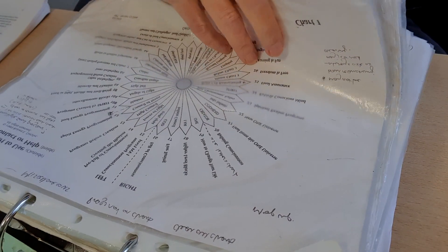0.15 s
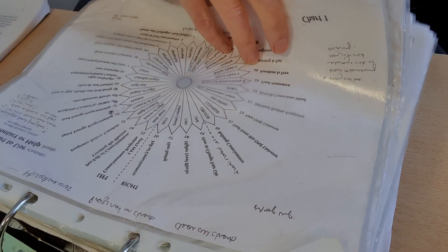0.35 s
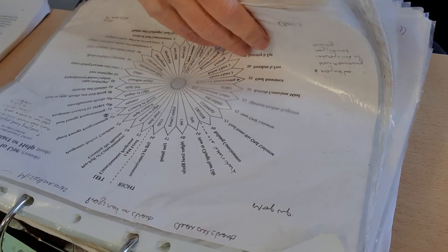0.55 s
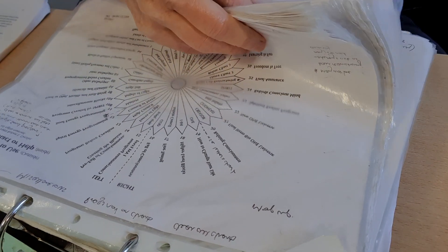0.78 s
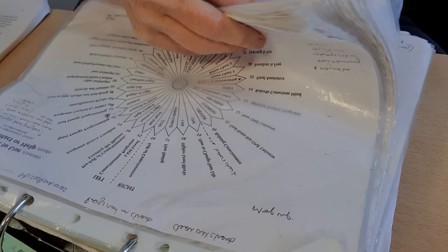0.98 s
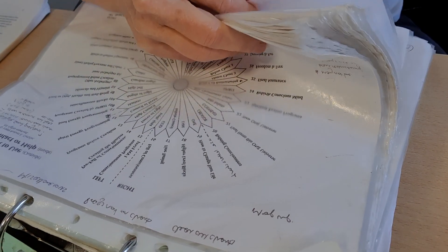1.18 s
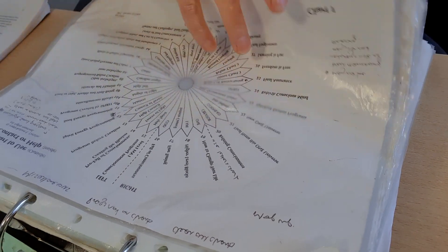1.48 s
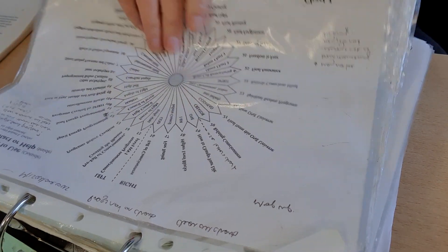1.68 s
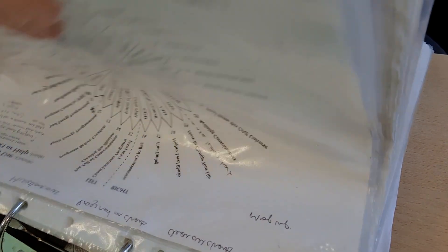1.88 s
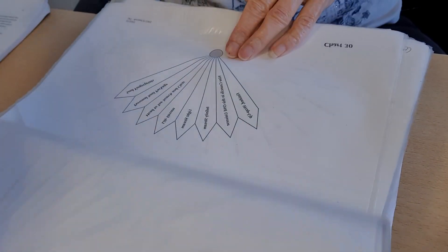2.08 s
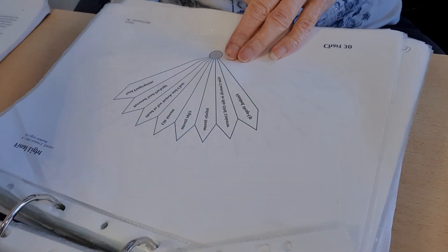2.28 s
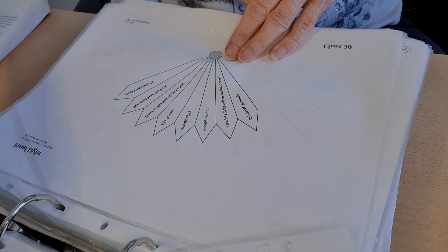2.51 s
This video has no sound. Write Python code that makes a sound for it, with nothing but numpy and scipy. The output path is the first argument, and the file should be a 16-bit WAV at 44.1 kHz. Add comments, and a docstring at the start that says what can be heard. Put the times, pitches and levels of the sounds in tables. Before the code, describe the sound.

Close stereo sound of one plastic sleeve being turned: quiet rubbing and a few small ticks, a sudden burst of crackling film, dull slaps as the page lands, then a fading slide, over low electrical hum indoors.

```python
"""Turning a plastic sleeve in a ring binder

A hand slides over plastic sleeves, lifts one and turns it from right to left, close to the microphone. The film
rubs in dense tiny slips (bursts of noise), buckles and its edges tick, with sharp snaps (short rings and
cracks). The page flaps down (damped thuds), puffs air at the microphone (swells of low noise) and slides to
rest. A mains hum (two sine tones) runs underneath, with quiet noise, in a small room (a short noise tail)."""
import sys
import numpy as np
from scipy import signal
from scipy.fft import rfft, irfft, next_fast_len
from scipy.io import wavfile
from scipy.ndimage import uniform_filter1d, map_coordinates

SR = 44100
rng = np.random.default_rng(int(sys.argv[2]) if len(sys.argv) > 2 else 0)


def transcribe(u):
    """Save the signal u as a 16-bit wav file named by the first command-line argument.

    u: samples, shape (n,) or (channels, n), limited to [-1, 1]; the rate is SR.
    q: integer samples, one column per channel.
    """
    v = np.clip(np.atleast_2d(u).T, -1, 1)
    q = np.round(v * 32767).astype(np.int16)
    wavfile.write(sys.argv[1], SR, q)


N = 116865  # length in samples

# where the page is: balance for its rasp, fizz, crinkles and snaps;
# lag for these, the flexing, the binder body and the flaps:
# [t/s, left minus right/dB, lag of the left port/ms]
PAGE_PLACE = [(1.6, -4.2, .21), (2.15, 0, -0.0826)]
# shapes of the rubbing spectra, whose overall level is set later: [f/Hz, level per Hz/dB]
RASP_COLOUR = [(400, 0.5), (1250, -0.5), (3800, 0), (5000, -8), (7000, -9), (16000, -54)]
FIZZ_COLOUR = [(2500, -12), (4500, 0.5), (6000, -1.5), (11000, -3.5), (16000, -12.5)]
CRINKLE_COLOUR = [(700, 0.5), (3000, -0.5), (8000, -6), (16000, -10)]
FLEX_COLOUR = [(70, -14.5), (170, -4.5), (640, -6), (1300, -10), (2500, -48)]
CRINKLE_DB = 2  # crinkles against the fizz at the hardest stroke
CRINKLE_GROWS = 1.22  # power: crinkles grow faster than the fizz


def rubbing():
    """Sleeve slides on sleeve: a papery rasp, a fizz with sparser crinkles, and the flexing sheet."""
    rasp_gain, treble_gain, flex_gain = stroke_levels()
    rasp = rasp_gain * through_gap(slips(RASP_COLOUR, alike=0.4))
    fizz = treble_gain * slips(FIZZ_COLOUR, alike=0.052)
    hardest = treble_gain.max()
    crinkle_gain = amp(CRINKLE_DB) * hardest * (treble_gain / hardest) ** CRINKLE_GROWS
    crinkle = crinkle_gain * slips(CRINKLE_COLOUR, alike=0.25, rate=150)
    flex = flex_gain * slips(FLEX_COLOUR, alike=1, spread_db=2.0)
    balance = panned(curves(PAGE_PLACE)[0])
    return (rasp + fizz + crinkle) * balance + flex + binder_body(rasp_gain)


# strokes of sleeve on sleeve: [start t/s, rise/s, time to fall by 20 dB/s, rasp level/dB,
# treble against the rasp/dB, low flexing against the rasp/dB]
STROKES = [(0.489, 0.22, 0.2, -55.5, -7, -11), (0.773, 0.036, 0.1267, -48, -8.5, -11.5),
           (0.9, 0.14, 0.23, -54, -13, -24), (1.095, 0.07, 0.07, -50.5, -6.5, -22.5),
           (1.27, 0.24, 0.2, -58, -9, -21), (1.527, 0.059, 0.18, -49, -4, -3.5),
           (1.719, 0.046, 0.1, -44.5, -7.5, -5), (1.81, 0.12, 1, -51.5, -1, -5),
           (1.958, 0.02, 0.21, -42, -3.5, -7.5), (2.12, 0.04, 0.18, -42.5, -0.5, -0.5),
           (2.168, 0.13, .08, -34.5, -10.5, -0.5), (2.392, 0.11, 0.12, -42, -7.5, 1.5),
           (2.489, 0.024, 0.03, -39, -4, -7), (2.48, 0.15, 2.5, -47.5, -14.5, -3.5)]
RISE_POWER, FALL_POWER = 1.195, 1.12  # how the swell and the release bend


def stroke_levels():
    """Each stroke swells and lets go; returns the gains of rasp, treble and flexing."""
    t = np.arange(N) / SR
    power = np.zeros((3, N))
    for start, rise, fall, db, treble_db, flex_db in STROKES:
        swell = np.clip((t - start) / rise, 0, 1) ** RISE_POWER
        since_top = np.maximum(t - start - rise, 0)
        release = amp(-20 * (since_top / fall) ** FALL_POWER)
        gains = amp(db + np.array([[0], [treble_db], [flex_db]]))
        power += (gains * swell * release) ** 2  # overlapping strokes add as power
    return np.sqrt(power)


def slips(colour, alike, rate=2500, spread_db=3.0, life_s=0.00047, patchy_db=2.5):
    """Stick-slip friction: tiny bursts of uneven size, each patch of film with its own colour."""
    starts = rng.random(N) < rate / SR  # rate: slips per second on average
    size = np.minimum(rng.exponential(size=N), 3)
    kicks = starts * amp(spread_db * size) ** 2
    power = signal.lfilter([1], [1, -np.exp(-2 / (life_s * SR))], kicks)  # every slip dies away
    z = signal.stft(pair(alike) * np.sqrt(power), nperseg=128)[2]
    # a smooth random map over frequency and time gives the patches
    patches = uniform_filter1d(rng.standard_normal(z.shape[1:]), size=4, axis=0)
    patches = uniform_filter1d(patches, size=4, axis=1)
    patchy = signal.istft(z * amp(patchy_db * unit(patches)), nperseg=128)[1][:, :N]
    return coloured(patchy, colour)


# resonance of the air gap between the sleeves: [t/s, f/Hz]
GAP_RESONANCE = [(.72, 1110), (.88, 2100), (1.0, 1310), (1.36, 2980), (1.56, 1010), (2.15, 1050),
                 (2.33, 620), (2.46, 950)]
GAP_Q = 1.43  # sharpness


def through_gap(x):
    """The air gap rings at its resonance and lets little out below it."""
    hz, t, z = signal.stft(x, SR, nperseg=512)
    ratio = hz[:, None] / np.interp(t, *np.transpose(GAP_RESONANCE))
    response = ratio ** 2 / np.hypot(1 - ratio ** 2, ratio / GAP_Q)
    return unit(signal.istft(z * response, SR, nperseg=512)[1][:, :N])


# two dull resonances of the stack and binder, their sharpness, and their level for a stroke gain of 1
BODY_HZ, BODY_Q, BODY_DB = [179, 315], 2.5, -41.5


def binder_body(stroke):
    """The stack and binder answer each stroke with low noise that grows more slowly than the rasp."""
    def ring(hz):
        return sum(1 / (1 + 1j * BODY_Q * (hz / mode - mode / (hz + 1))) ** 2 for mode in BODY_HZ)
    return amp(BODY_DB) * np.sqrt(stroke) * unit(filtered(rng.standard_normal(N), ring))


# the film buckles (high rows) and sleeve edges tick on one another (rows near 3.5 kHz): [t/s, peak level before
# panning/dB, pitch f/Hz]
SNAPS = [(0.107, -59.5, 4000), (0.527, -46.5, 2800), (0.6617, -35, 7660), (0.7, -37, 3500),
         (0.823, -31, 3500), (0.967, -43, 1400), (1.1672, -32.5, 4460), (1.536, -37.5, 4500),
         (1.678, -33.5, 8160), (1.7344, -20, 6400), (1.755, -27.5, 7850), (1.7708, -24.5, 8100),
         (1.782, -26.5, 2630), (1.812, -25, 3500), (1.8398, -31, 7540), (1.867, -27, 9050),
         (1.918, -28, 3470), (1.965, -19.5, 3740), (1.9768, -21, 4060), (2.013, -26.5, 5600),
         (2.0341, -19, 5050), (2.1025, -21.5, 3500), (2.1377, -22, 5600), (2.1516, -19.5, 6850),
         (2.158, -24, 3500), (2.1976, -19.5, 4000), (2.2725, -20.5, 3000), (2.513, -22.5, 3270)]
# a weaker snap follows after roughly this long (varied at random)
REBOUND_S, REBOUND_DB = 0.003, -12.5
# T60: time to fall by 60 dB; crack and shiver levels are relative to the ring
SNAP_T60_S, SNAP_CRACK_DB = 0.0023, -1.5
SHIVER_DB, SHIVER_T60_S = -7, 0.0091


def snaps():
    """A crease pops through or a sleeve edge ticks: a few cycles, a crack and a brief shiver; a weaker one
    follows."""
    out = np.zeros((2, N))
    t = np.arange(SR // 40) / SR
    for start, db, hz in SNAPS:
        band = signal.butter(2, np.clip([hz / 3, hz * 2.5], 200, 19000), 'band', fs=SR)
        rebound_s = REBOUND_S * rng.uniform(0.5, 1.8)
        for delay, less_db in [(0, 0), (rebound_s, REBOUND_DB)]:
            ring = np.sin(2 * np.pi * hz * t + rng.uniform(0, np.pi, (2, 1)))
            crack, shiver = signal.lfilter(*band, rng.standard_normal((2, 2, len(t))))
            pop = (ring + amp(SNAP_CRACK_DB) * unit(crack)) * amp(-60 * t / SNAP_T60_S)
            snap = pop + unit(shiver) * amp(SHIVER_DB - 60 * t / SHIVER_T60_S)
            peak = np.abs(snap).max(axis=1, keepdims=True)
            add(out, start + delay, amp(db + less_db) * snap / peak)
    return out * panned(curves(PAGE_PLACE)[0])


# the page slaps and fingers tap on the stack: [t/s, starting level of the thud/dB, pitch f/Hz]
FLAPS = [(1.25, -46, 310), (1.566, -37, 360), (1.661, -39, 470), (1.748, -38, 419), (2.2365, -20, 584),
         (2.2942, -20.5, 644), (2.3126, -21, 105), (2.558, -29, 300)]
# time to fall by 60 dB; the skin (top sheet) is set against the thud
THUD_T60_S, SKIN_DB, SKIN_T60_S = 0.019, -13, 0.056


def flaps():
    """Soft, heavily damped blows on the stack of pages; the top sheet shivers on after each."""
    out = np.zeros((2, N))
    t = np.arange(SR // 20) / SR
    for start, db, hz in FLAPS:
        lowpass = signal.butter(2, hz * 3, fs=SR)
        skin = unit(signal.lfilter(*lowpass, rng.standard_normal((2, len(t)))))
        thud = np.sin(2 * np.pi * hz * t) * amp(-60 * t / THUD_T60_S)
        shiver = skin * amp(SKIN_DB - 60 * t / SKIN_T60_S)
        add(out, start, amp(db) * (thud + shiver))
    return out


# air pushed at the ports by the moving page: [t/s, length/s, level/dB, left minus right/dB]
PUFFS = [(1.925, 0.043, -43.5, 1), (2.304, 0.051, -34.5, 7), (2.335, 0.057, -30, 14),
         (2.403, 0.17, -43.5, 27), (2.552, 0.034, -39, 12.5)]
# shape of the puff spectrum: [f/Hz, level per Hz/dB]
AIR_COLOUR = [(30, -20), (90, 0.5), (130, -10.5), (800, -61)]


def puffs():
    """The moving page fans air over the ports: low noise that swells and sinks."""
    out = np.zeros((2, N))
    t = np.arange(N) / SR
    for start, length, db, pan_db in PUFFS:
        swell = np.sin(np.pi * np.clip((t - start) / length, 0, 1))
        air = swell * coloured(pair(0.98), AIR_COLOUR)
        even = np.sqrt(np.mean(swell ** 2) / np.mean(air ** 2))  # evens out chance loudness
        out += amp(db) * panned(pan_db) * air * even
    return out


# mains hum: [t/s, level/dB]
HUM_LEVEL = [(.72, -56), (.95, -49), (1.69, -49), (1.82, -44.5), (2.25, -44), (2.45, -47.5)]
# shape of the quiet noise spectrum: [f/Hz, level per Hz/dB]
FLOOR_COLOUR = [(110, 4), (200, -8), (500, -21.5), (16000, -39)]
HUM_HZ, HUM_OCTAVE_DB, HUM_PAN_DB = 60.2, -20, 1.55  # octave against the hum; left minus right
FLOOR_DB = -64.5


def background():
    """Mains hum with a weak octave over the quiet noise of the room."""
    level_db, = curves(HUM_LEVEL)
    turn = 2 * np.pi * HUM_HZ * np.arange(N) / SR
    tone = unit(np.sin(turn) + amp(HUM_OCTAVE_DB) * np.sin(2 * turn))
    hum = amp(level_db) * tone * panned(HUM_PAN_DB)
    return hum + amp(FLOOR_DB) * coloured(pair(0.42), FLOOR_COLOUR)


ROOM_DB, ROOM_T60_S = -8.5, 0.16  # level of the tail, time to fall by 60 dB
ROOM_SHARED_HZ = 550  # here half the power of the tail is common to both ports


def room(x):
    """Echoes blur into a short noise tail; both ports share its bass."""
    hz, t, z = signal.stft(rng.standard_normal((3, SR // 3)), SR, nperseg=256)
    alike = 1 / (1 + (hz[:, None] / ROOM_SHARED_HZ) ** 2)
    z = np.sqrt(alike) * z[0] + np.sqrt(1 - alike) * z[1:]
    tail = signal.istft(z * amp(-60 * t / ROOM_T60_S), SR, nperseg=256)[1]
    return signal.fftconvolve(x, tail / np.linalg.norm(tail[0]), axes=1)[:, :N]


def amp(db):
    """Decibels to gain."""
    return 10 ** (np.asarray(db) / 20)


def unit(x):
    """Scale to rms 1."""
    return x / np.sqrt(np.mean(x ** 2) + 1e-20)


def along(points, hz):
    """Read a curve of (Hz, value) points on a log frequency axis."""
    f, v = np.transpose(points)
    return np.interp(np.log(hz + 1), np.log(f + 1), v)


def curves(rows):
    """One value per sample for each column after the time."""
    s, *cols = np.transpose(rows)
    return [np.interp(np.arange(N) / SR, s, c) for c in cols]


def filtered(x, response):
    """Multiply the spectrum of x by a response of frequency."""
    m = next_fast_len(N + SR // 2)
    return irfft(rfft(x, m) * response(np.fft.rfftfreq(m, 1 / SR)), m)[..., :N]


def coloured(x, colour):
    """Shape the spectrum of x by a colour, at rms 1."""
    return unit(filtered(x, lambda hz: amp(along(colour, hz))))


def panned(pan_db):
    """Left and right gains of constant power."""
    g = amp(np.array([pan_db, -pan_db]).reshape(2, -1) / 2)
    return g / np.sqrt(np.mean(g ** 2, axis=0))


def pair(alike):
    """White noise at two ports, sharing a part of its power (0 to 1)."""
    z = rng.standard_normal((3, N))
    return np.sqrt(alike) * z[0] + np.sqrt(1 - alike) * z[1:]


def add(out, s, sound):
    """Mix a sound in at time s."""
    part = out[:, max(round(s * SR), 0):][:, :sound.shape[-1]]
    part += sound[..., :part.shape[1]]


def scene():
    """Rubbing, snaps and flaps reach the two ports at slightly different times; the rest joins in."""
    left, right = rubbing() + snaps() + flaps()
    lag = curves(PAGE_PLACE)[1] * SR / 1000  # ms to samples
    page = np.array([map_coordinates(left, [np.arange(N) - lag], order=5), right])
    return page + amp(ROOM_DB) * room(page) + puffs() + background()


TOP_HZ = 16100


def record(dry):
    """Nothing is kept above the band limit."""
    return filtered(dry, lambda hz: hz < TOP_HZ)


dry = scene()
out = record(dry)
transcribe(out)
```